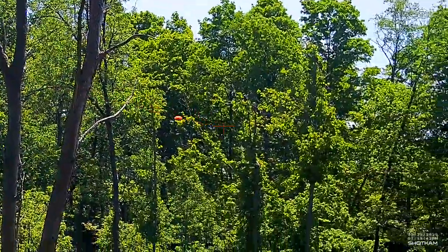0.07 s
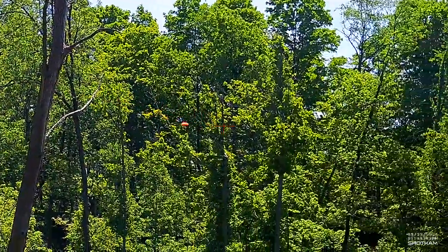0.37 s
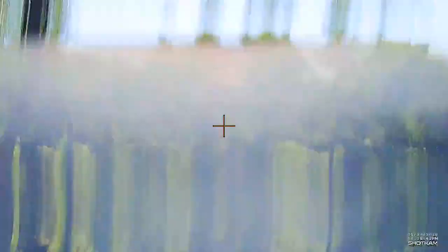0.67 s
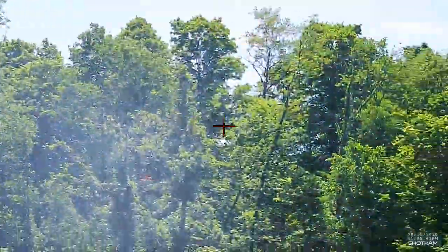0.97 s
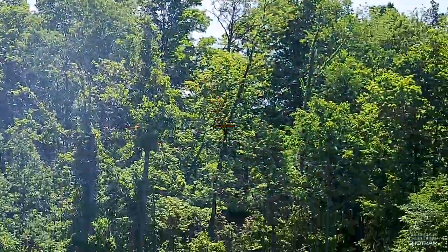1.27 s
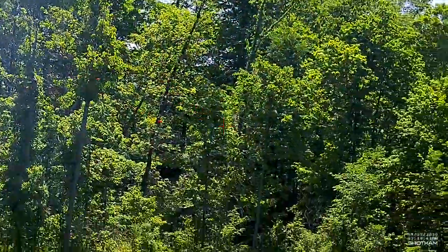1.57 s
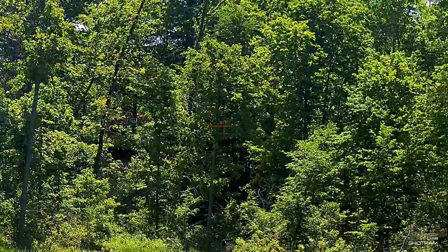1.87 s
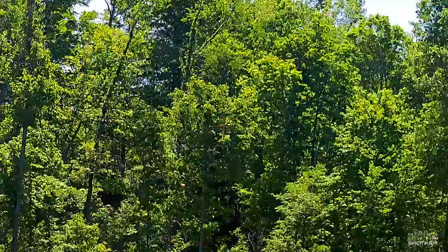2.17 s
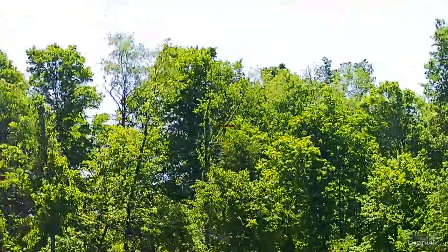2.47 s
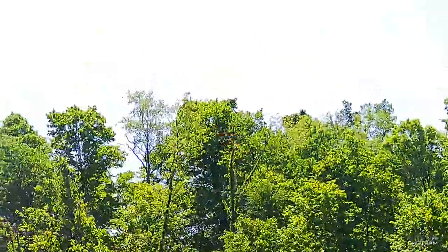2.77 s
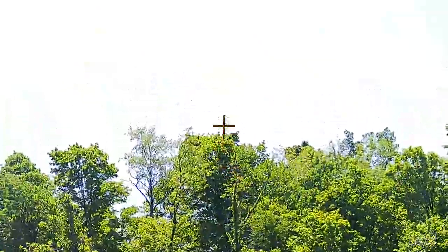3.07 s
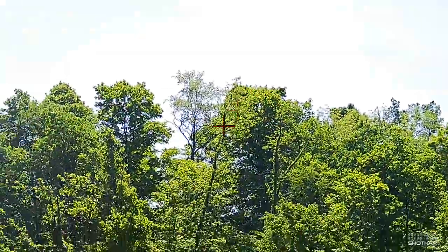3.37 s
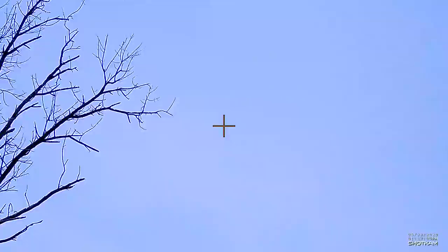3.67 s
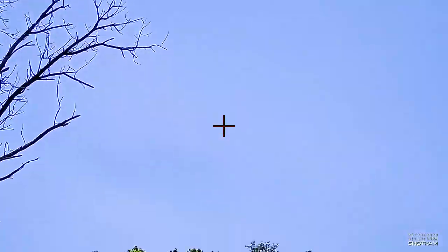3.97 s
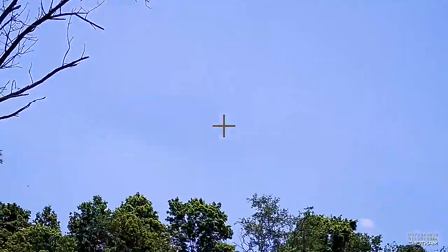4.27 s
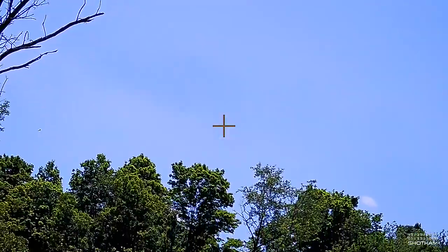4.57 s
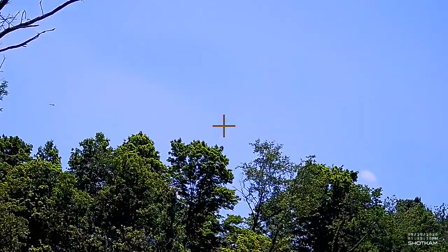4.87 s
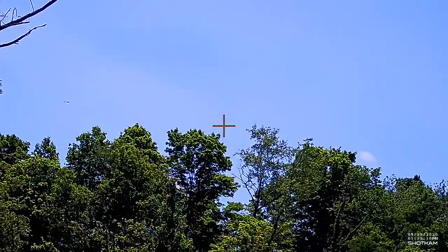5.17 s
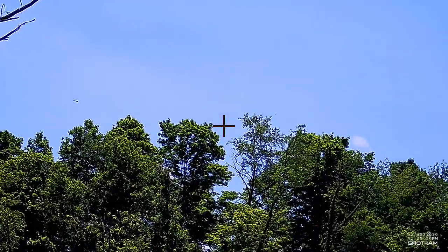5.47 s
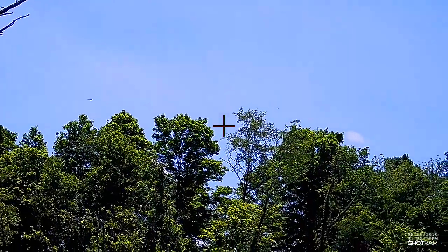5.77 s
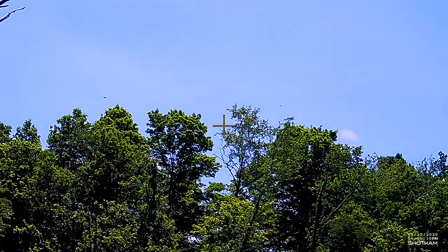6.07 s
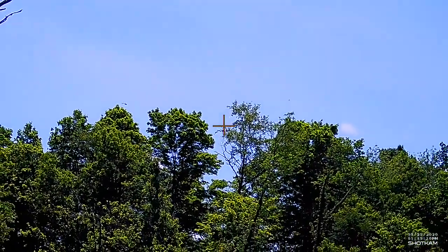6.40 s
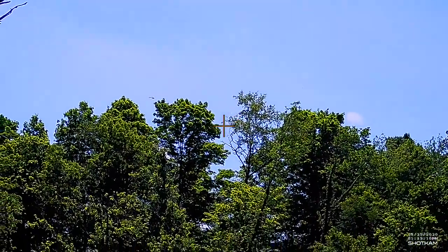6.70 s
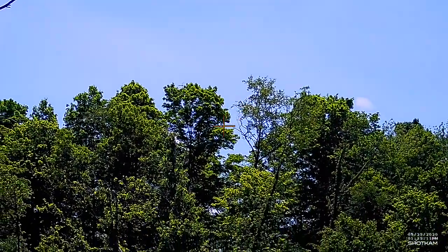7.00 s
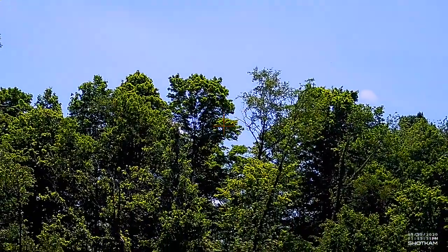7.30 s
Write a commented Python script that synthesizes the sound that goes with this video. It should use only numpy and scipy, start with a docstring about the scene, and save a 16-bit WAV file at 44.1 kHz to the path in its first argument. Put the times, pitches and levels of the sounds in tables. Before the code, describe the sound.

A single close shotgun shot with a brief metallic clatter and rumbling outdoor echo, then quiet knocks, clicks and hand slides over hiss.

```python
"""One shotgun shot at a clay range, heard by a small camera clamped under the barrel.
Over a quiet hiss the hammer falls; pressure wave and recoil drive the microphone from rail to rail,
chopping the clatter of the action. The woods echo, the bore hums on, and hands knock and tick on
the moving gun. The recorder pauses once and the hum is gone; faint knocks, slides and ticks follow."""
import sys
import numpy as np
from scipy import signal
from scipy.fft import rfft, irfft
from scipy.io import wavfile
from scipy.ndimage import uniform_filter1d

SR = 44100
rng = np.random.default_rng(int(sys.argv[2]) if len(sys.argv) > 2 else 0)


def generate_wav(signal):
    """Clip the signal to [-1, 1] and save it as 16-bit WAV at the path in sys.argv[1]."""
    frames = np.transpose(np.atleast_2d(signal))
    scaled = np.clip(frames, -1, 1) * 32767
    pcm = np.round(scaled).astype(np.int16)
    wavfile.write(sys.argv[1], SR, pcm)


N = 332514
T = np.arange(N) / SR
SHOT_S, PAUSE_START_S, PAUSE_END_S = .6806, 3.508, 3.686
BAND_HZ = 8000

# Microphone hiss and air drift. Each row: frequency in Hz, relative spectral density in dB.
HISS_SPECTRUM = [(3, 10.5), (20, -8), (45, -8.5), (90, -17.5), (200, -22.5), (700, -29.5), (1500, -33),
                 (5000, -36), (7700, -35)]
# Impacts in the action. Each row: start in seconds, strength in dB, hardness (crack over ring) in dB.
BLOWS = [(0.6709, 15, -28), (.6807, -6, 12), (.6903, -3, 21.5), (.7012, -6, 9.5), (.7238, -1.5, 9.5),
         (.7368, -15.5, 8), (.7538, -16.5, 6), (.757, -13.5, 9), (.7735, -7.5, -6.5), (.7925, -15, -1.5),
         (.8004, -26, 10.5), (.8124, -11.5, -5.5), (.8272, -18.5, 1.5), (.8515, -25, -4), (.9565, -42, 10)]
# Modes of barrel and action. Each row: frequency in Hz, relative level in dB, t60 in seconds.
STEEL_MODES = [(560, -.5, .04), (669, -7, .3), (827, -15.5, .33), (1040, -5.5, .05), (2093, -17.5, 0.061),
               (3250, -21, 0.1), (4790, 0, 0.034)]
# Vibration of the mount, stiffening as it settles. Each row: time in seconds, frequency in Hz.
MOUNT_SHAKE = [(.68, 41.74), (.745, 43.2), (.765, 48.3), (.9, 48.5)]
# Echo of the woods. Each row: frequency in Hz, relative spectral density in dB, t60 in seconds.
ECHO_BANDS = [(30, -6, 1.05), (85, -7, 1.2), (135, -10.5, 0.85), (220, 3, 1.12), (430, -13.5, 0.23),
              (630, -3.5, 1.05), (1220, -9, 0.93), (1650, -23.5, .95), (2620, -25.5, 1), (5500, -26.5, .6),
              (8000, -33, 0.42)]
# Resonances of the bore. Each row: frequency in Hz, width in Hz, relative level in dB.
BORE_MODES = [(210, 44, -0.5), (570, 110, -1.5), (700, 130, -3), (1080, 170, -4.5)]
# Swings of the gun. Each row: middle in seconds, half width in seconds, level in dB.
SWINGS = [(2.6, .9, -58), (2.345, 0.084, -55.5), (3.4, 0.021, -53.5)]
# Rumble of the moving gun. Each row: frequency in Hz, relative spectral density in dB.
RUMBLE_SPECTRUM = [(20, 3.5), (45, 0), (75, 0), (105, 4), (170, -2.5), (300, -12), (600, -13.5),
                   (1200, -24.5), (3000, -45)]
# Thumps of stock and bore. Each row: start in seconds, level in dB, frequency in Hz, t60 in seconds.
THUMPS = [(.6863, 22.7, 134, .072), (.6877, 29.5, 200, .049), (.6909, 27, 1060, .018)]
# Knocks of the hand on the stock. Each row: start in seconds, level in dB.
KNOCKS = [(1.263, -27.5), (1.856, -52), (2.349, -49), (3.695, -46.5), (3.8575, -58.5), (4.344, -58.5),
          (5.2984, -63)]
# Hollow resonances of a knock.
# Each row: frequency in Hz, width in Hz, relative level in dB, grit t60 in seconds.
KNOCK_MODES = [(201, 88, 1, 0.13), (574, 250, -0.5, 0.085)]
# Ticks of the action. Each row: start in seconds, peak in dB, frequency in Hz, grit t60 in seconds.
TICKS = [(2.3501, -41.5, 835, 0.012), (2.35, -49.5, 2800, 0.003), (2.939, -39, 880, 0.0094),
         (2.9553, -39.5, 940, 0.0064), (2.9659, -39, 810, 0.012), (2.9693, -43.5, 867, 0.0074),
         (2.9719, -48, 890, .007), (3.273, -46.5, 780, 0.023), (5.874, -61, 1020, .05),
         (6.1007, -57.5, 629, 0.099)]
# Hand slides. Each row: start in seconds, length in seconds, level in dB, centre in Hz, width in Hz.
SLIDES = [(5.85, 0.35, -72, 1075, 70), (5.9, 0.58, -74, 655, 180), (6.103, 0.37, -68.5, 219, 80),
          (7.201, 0.45, -68, 443, 250), (7.199, 0.41, -68.5, 216, 90)]


def undb(db):
    """Decibels to amplitude ratio."""
    return 10 ** (np.asarray(db) / 20)


def unit(x):
    """Normalisation to rms 1."""
    return x / np.sqrt(np.mean(x ** 2))


def since(s):
    """Seconds since a moment, zero before it."""
    return np.maximum(T - s, 0)


def fade(t, t60):
    """Exponential decay, 60 dB in t60."""
    return np.exp(-np.log(1000) * t / t60)


def swell(s, half_s):
    """Gaussian bell of height 1 around time s."""
    return np.exp(-((T - s) / half_s) ** 2)


def add(out, s, x):
    """Superposition of a short sound at time s."""
    i = int(s * SR)
    out[i:i + len(x)] += x[:N - i]


def soften(x, hz):
    """Second-order low-pass."""
    return signal.sosfilt(signal.butter(2, hz, fs=SR, output="sos"), x)


def resonate(x, hz, width):
    """Two resonators of this width in cascade, for steep skirts."""
    b, a = signal.iirpeak(hz, hz / width, fs=SR)
    return signal.lfilter(b, a, signal.lfilter(b, a, x))


def noise(colour):
    """Noise of rms 1 with a spectrum of (Hz, dB) points, falling away below the first."""
    hz, db = np.transpose(colour)
    f = np.maximum(np.arange(N // 2 + 1) * SR / N, 1)
    gain = undb(np.interp(np.log(f), np.log(hz), db)) * np.minimum(f / hz[0], 1)
    return unit(irfft(rfft(rng.standard_normal(N)) * gain, N))


def wander(samples):
    """Slow fluctuation of rms 1: a moving average of noise."""
    return unit(uniform_filter1d(rng.standard_normal(N), size=samples))


def hiss(db=-56):
    """Stationary noise: the microphone's own hiss and the slow drift of the air."""
    return undb(db) * noise(HISS_SPECTRUM)


def action(detune=.0081, crack_hz=5400, crack_cycles=5, crack_t60=.014, dull_below_db=-5.5):
    """Impact excitation: hammer, discharge and rattling bolt each crack and ring the steel's modes."""
    out, t = np.zeros(N), T[:SR // 2]
    for s, strength_db, hard_db in BLOWS:
        contact_s = .0002 + .000075 * max(dull_below_db - hard_db, 0)  # softer blows touch for longer
        scatter = 1 + detune * rng.standard_normal(len(STEEL_MODES))
        ring = 0
        for (hz, db, t60), tuning in zip(STEEL_MODES, scatter):
            drive = 1 / (1 + (2 * hz * contact_s) ** 2)  # a long contact leaves the high modes still
            ring += drive * undb(db) * fade(t, t60) * np.sin(2 * np.pi * hz * tuning * t)
        burst = soften(rng.standard_normal(len(t)), min(crack_hz, crack_cycles / contact_s))
        crack = undb(hard_db) * unit(burst) * fade(t, crack_t60)
        add(out, s, undb(strength_db) * (ring + crack) * (1 - np.exp(-t / contact_s)))
    return out


def muzzle_wave(gain_db=26, rise_s=.0065, push_s=.04, relax_s=.0285):
    """Blast wave: overpressure, then a longer suction while the microphone recovers."""
    t = since(SHOT_S)
    onset = 1 - np.exp(-(t / rise_s) ** 2)
    return undb(gain_db) * onset * (1 - t / push_s) * np.exp(-t / relax_s)


def recoil(gain_db=16, t60=.29, rise_s=.006, lopsided=.12):
    """Damped oscillation: the kick swings the camera on its mount, sharper one way than the other."""
    t = since(SHOT_S)
    hz = np.interp(T, *np.transpose(MOUNT_SHAKE))
    phase = 2 * np.pi * np.cumsum(hz * (t > 0)) / SR
    onset = 1 - np.exp(-(t / rise_s) ** 2)
    return undb(gain_db) * onset * fade(t, t60) * (np.sin(phase) - lopsided * np.cos(2 * phase))


def woods_echo(gain_db=-15.5, build_s=.009, patchy_db=.27):
    """Scattering: trees return the report in uneven clumps, each band decaying at its own rate."""
    hz, _, t60 = np.transpose(ECHO_BANDS)
    spectrum, t = rfft(noise([row[:2] for row in ECHO_BANDS])), since(SHOT_S)
    log_f = np.log(np.maximum(np.arange(len(spectrum)) * SR / N, 1))
    bands = (irfft(spectrum * np.interp(log_f, np.log(hz), share), N) for share in np.eye(len(hz)))
    tail = sum(band * fade(t, decay) for band, decay in zip(bands, t60))
    return undb(gain_db + patchy_db * wander(350)) * (1 - np.exp(-t / build_s)) * tail


def bore_hum(attack_s=.6, hold_s=1.31, steadiness=.22, wander_db=1.4):
    """Standing waves: air stirs the open barrel to a hollow fundamental under broad overtones."""
    low, *upper = (undb(db) * unit(resonate(rng.standard_normal(N), hz, width))
                   for hz, width, db in BORE_MODES)
    low /= (np.abs(signal.hilbert(low)) + .5) ** steadiness  # the wave evens out its own swells
    low_db = -45.5 - 6.5 * since(SHOT_S + hold_s)  # holds, then sinks
    low_db -= 15 * swell(1.8, half_s=.047)  # the level dips briefly
    low_db += wander_db * wander(4000)
    upper_db = -47.5 - 8.5 * since(SHOT_S)  # the overtones sink from the start
    gate = np.interp(T, [SHOT_S, SHOT_S + attack_s, PAUSE_START_S, PAUSE_END_S], [0, 1, 1, 0])
    return gate * (undb(low_db) * unit(low) + undb(upper_db) * unit(sum(upper)))


def swing_rumble(held_db=-75):
    """Amplitude modulation: after the shot, the held gun's low rumble swells with each swing."""
    motion = undb(held_db) + sum(undb(db) * swell(s, half_s) for s, half_s, db in SWINGS)
    return (T > SHOT_S) * motion * noise(RUMBLE_SPECTRUM)


def thumps():
    """Free vibration: as the charge leaves, bore and stock spring back and ring briefly."""
    return -sum(undb(db) * fade(since(s), t60) * np.sin(2 * np.pi * hz * since(s))
                for s, db, hz, t60 in THUMPS)


def touch(hz, width, t60, grit=.13, cutoff_ratio=3.6):
    """Damped resonance, driven by an impulse and decaying grit; peak 1."""
    t = T[:SR // 4]
    contact = grit * rng.standard_normal(len(t)) * fade(t, t60)
    contact[0] += 2
    ring = resonate(contact, hz, width)
    knock = soften(ring, min(cutoff_ratio * hz, BAND_HZ))  # a soft hand leaves out the treble
    return knock / np.abs(knock).max()


def knocks():
    """Modal response: each soft knock of the hand briefly rings the bore with a hollow thud."""
    out = np.zeros(N)
    for s, level_db in KNOCKS:
        for hz, width, db, t60 in KNOCK_MODES:
            add(out, s, undb(level_db + db) * touch(hz, width, t60))
    return out


def ticks(width_times_t60=5.6):
    """Time-bandwidth reciprocity: the shorter a tick of the action, the broader its resonance."""
    out = np.zeros(N)
    for s, db, hz, t60 in TICKS:
        add(out, s, undb(db) * touch(hz, width_times_t60 / t60, t60))
    return out


def slides():
    """Friction: a hand sliding along the fore-end makes a band of noise that swells and fades."""
    out = np.zeros(N)
    for s, length, db, hz, width in SLIDES:
        rub = unit(resonate(rng.standard_normal(SR), hz, width))[:int(length * SR)]
        add(out, s, undb(db) * rub * np.hanning(len(rub)))
    return out


def scene():
    """Superposition: all sources add at the microphone, in one channel."""
    shot = action() + muzzle_wave() + recoil() + woods_echo() + bore_hum() + thumps()
    handling = knocks() + ticks() + slides() + swing_rumble()
    return (shot + handling + hiss())[None]


def record(dry, rail=.69, give=.0017, dull_hz=7400, coupling_hz=.55, top_hz=16000):
    """Saturation: the preamp hits its rails; the narrow-band recorder clips again and pauses once."""
    x = soften(np.clip(dry, -rail, rail) + give * dry, dull_hz)
    b, a = signal.butter(1, coupling_hz, "high", fs=SR)
    x = signal.lfilter(b, a, signal.lfilter(b, a, x))  # two coupling capacitors let the flat tops sag
    x = signal.sosfiltfilt(signal.butter(12, BAND_HZ, fs=SR, output="sos"), x)
    x = np.clip(x, -rail, rail)  # cuts the filters' overshoot
    x *= (T < PAUSE_START_S) | (T > PAUSE_END_S)
    return signal.sosfilt(signal.ellip(8, .2, 70, top_hz, fs=SR, output="sos"), x)


dry = scene()
out = record(dry)
generate_wav(out)
```